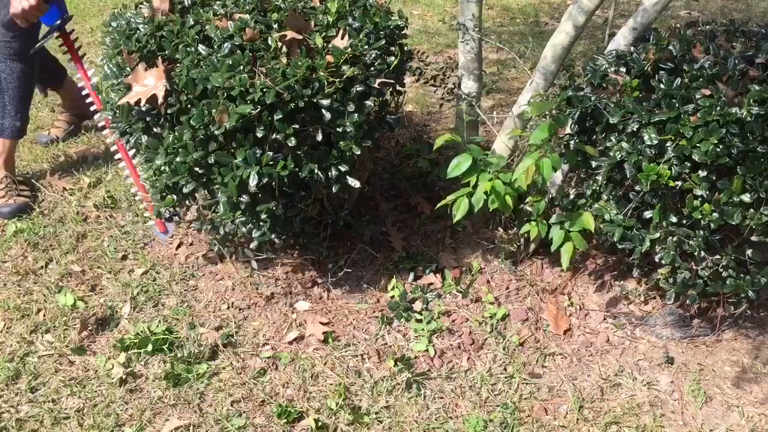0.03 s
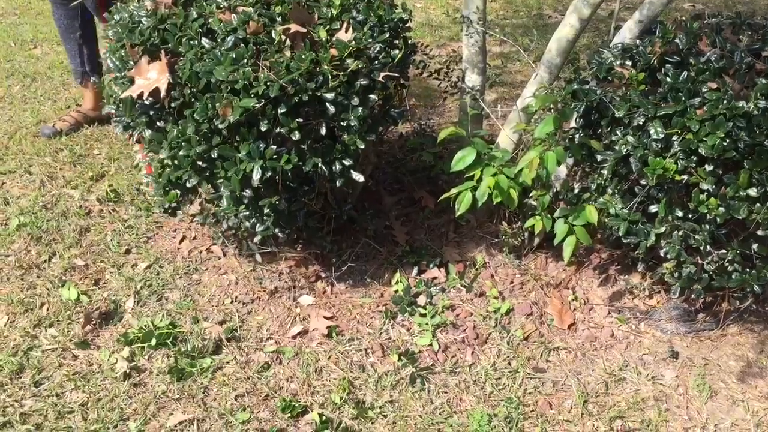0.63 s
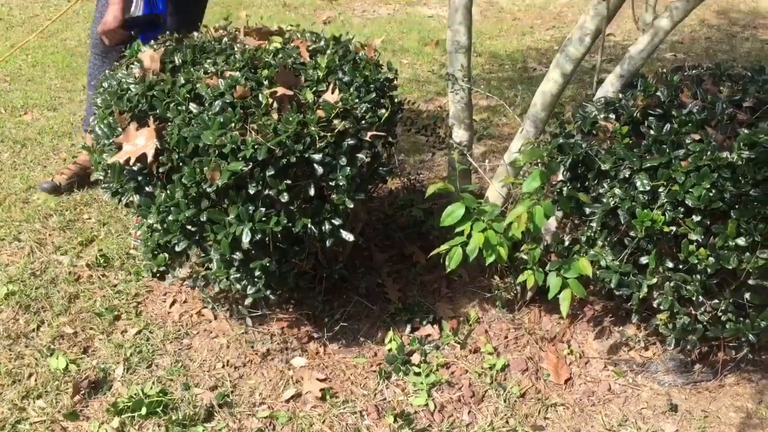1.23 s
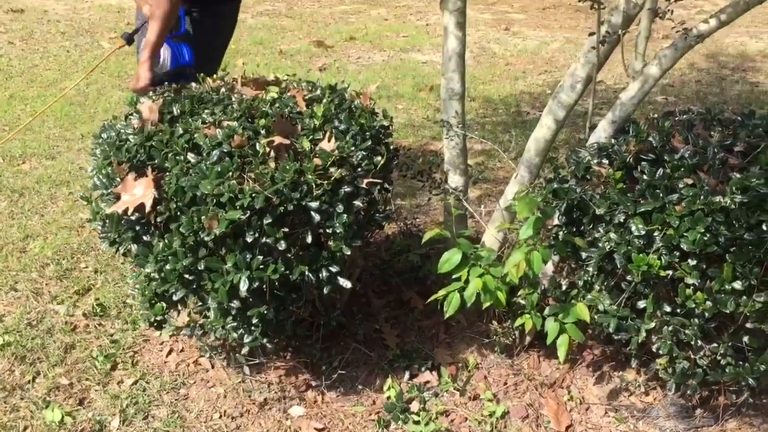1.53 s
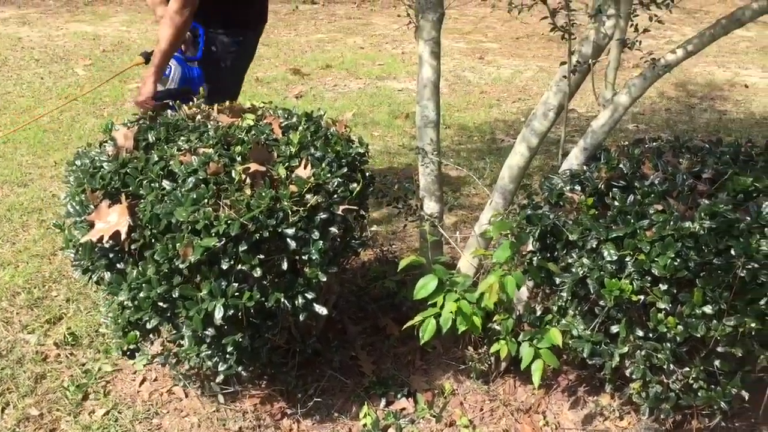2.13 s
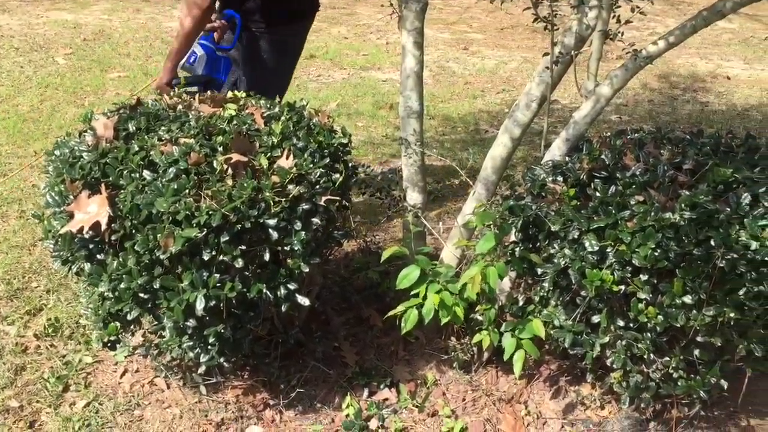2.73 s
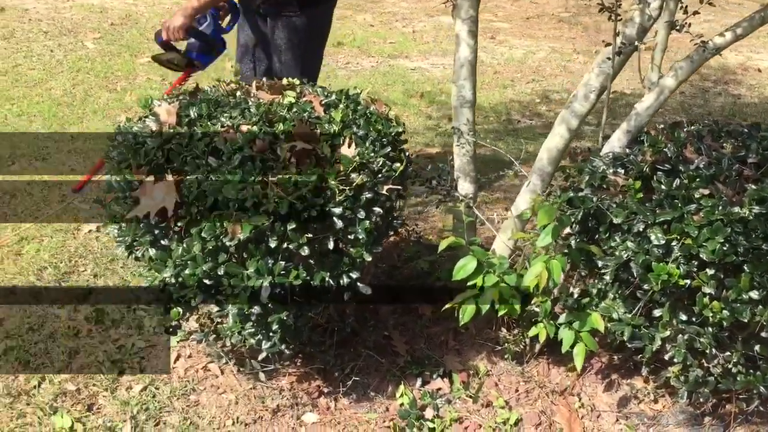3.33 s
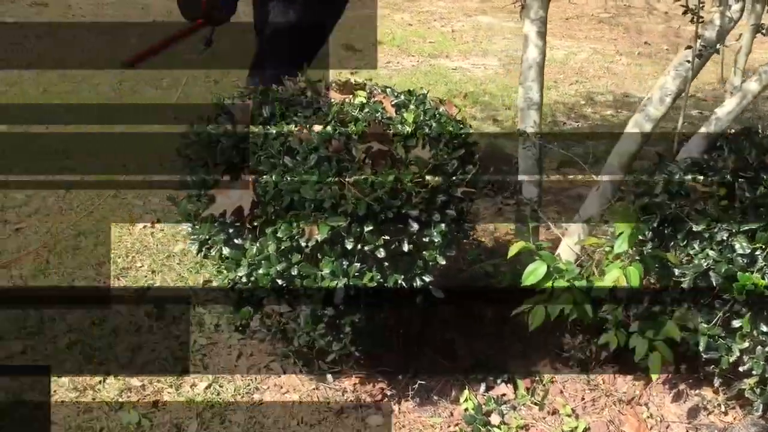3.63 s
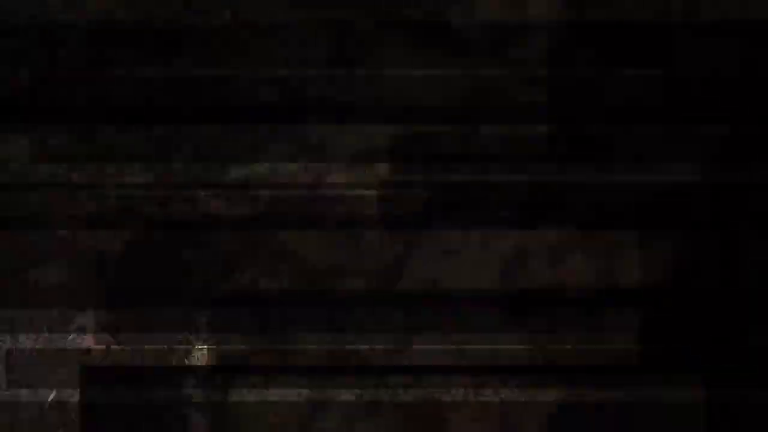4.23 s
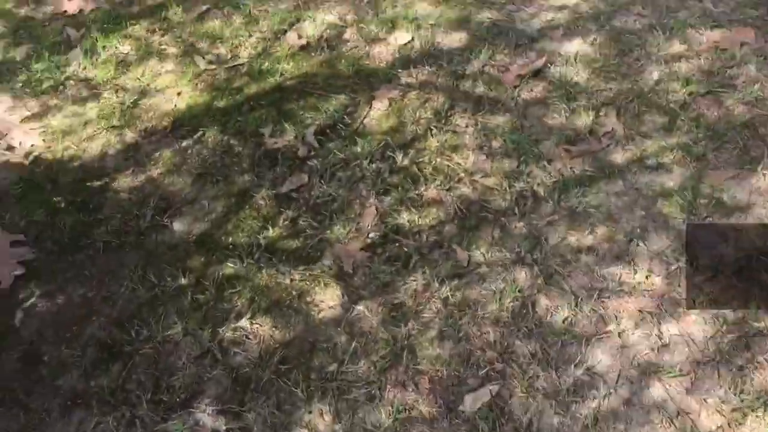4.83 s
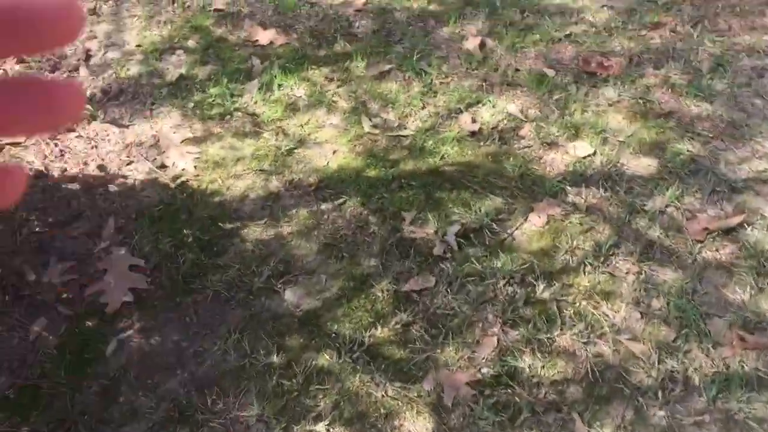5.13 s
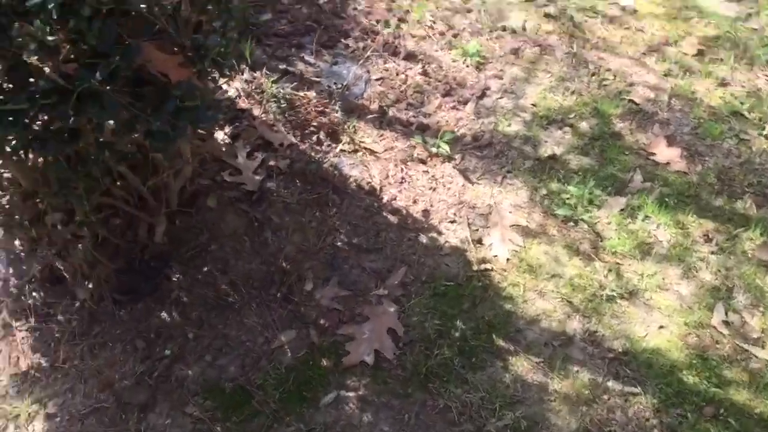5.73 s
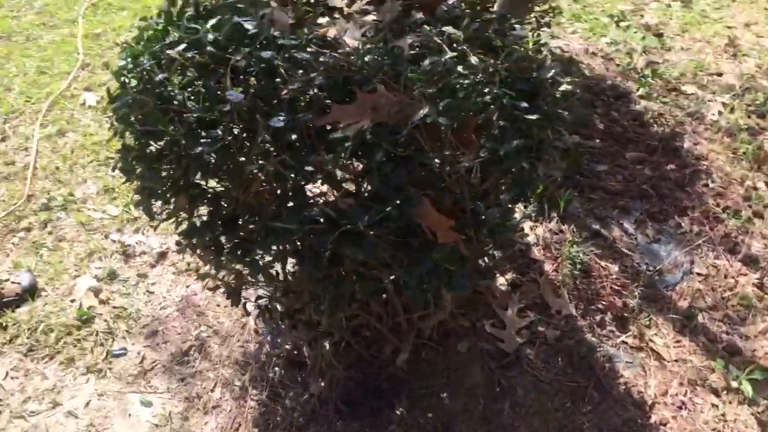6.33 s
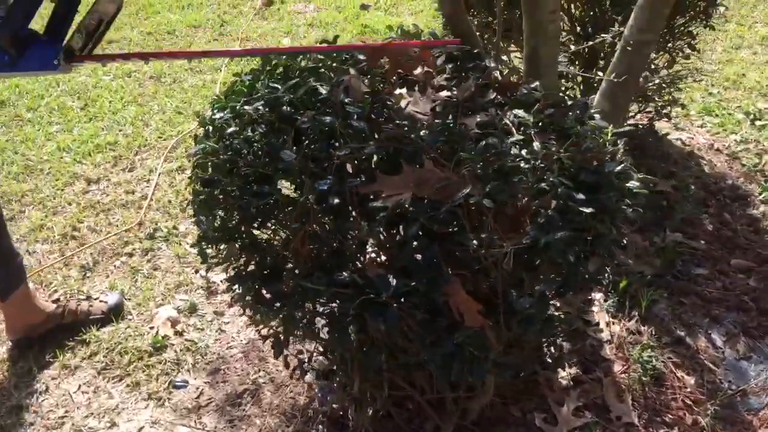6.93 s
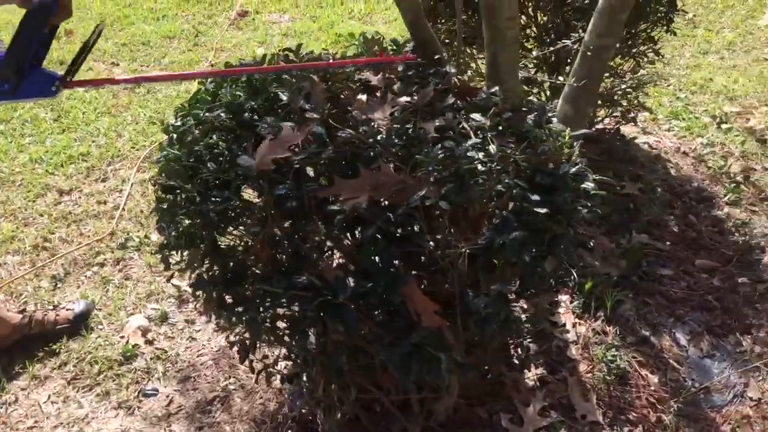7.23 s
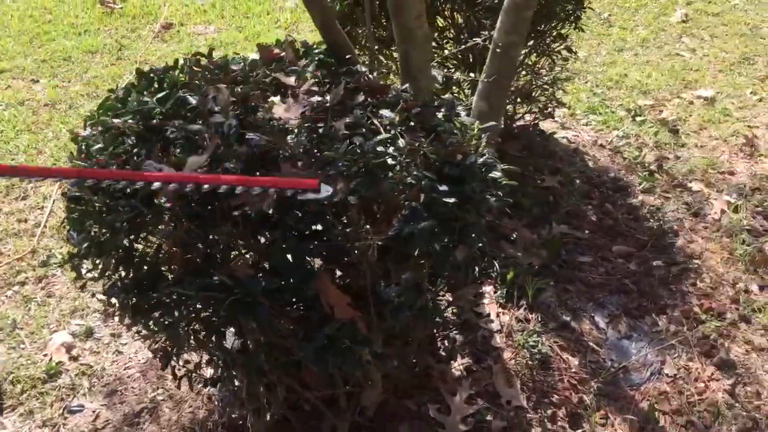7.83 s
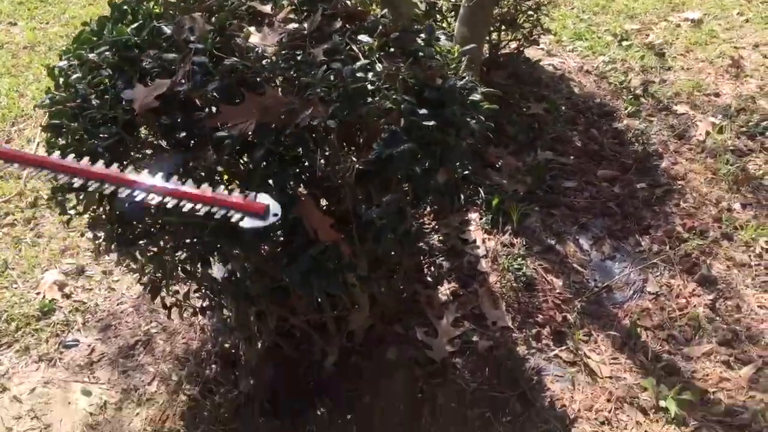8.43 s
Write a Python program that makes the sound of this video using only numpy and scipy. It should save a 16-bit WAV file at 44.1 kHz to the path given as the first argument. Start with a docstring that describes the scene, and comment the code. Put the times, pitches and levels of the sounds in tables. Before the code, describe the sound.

An electric hedge trimmer is already running, about three metres away and slightly screened by a shrub in an open yard. Its motor gives a steady mid-pitched hum with a throbbing gear whine and a thin, high fan whistle, while the blades knock, rattle and hiss rapidly. The whine swells and fades as the tool swings. Twigs crack with a leafy scrape around 0.3 seconds, snap sharply at 1.1, and tick again near 2.5. From 3.75 seconds the motor coasts down in pitch, and at 4.1 the sound drops out for an instant. It returns closer and fuller, reaching full speed by about 5 seconds. Foliage rasps along the bar between 4.8 and 5.6, with twigs splintering near 5.15. Two sharper snaps come at 7.5 and 7.8. The trimmer keeps running, about two metres away, until the end at 8.5 seconds. A faint, gusty outdoor rumble lies underneath.

```python
"""An electric hedge trimmer shapes a shrub in an open yard, two to three metres from the microphone:
first screened by the bush, then, after a brief hush, closer and in the clear.
The motor hums, its pinion and fan whine, and the blades knock and rattle at each turn of the crank.
Foliage scrapes along the bar; twigs snap between the teeth and slow the motor, which coasts down
before the hush and spins up after it. A faint outdoor rumble lies underneath."""
import numpy as np
from scipy import signal
from scipy.fft import rfft, irfft, next_fast_len
from scipy.ndimage import map_coordinates
import sys
import numpy as np
from scipy import signal
from scipy.fft import rfft, irfft, next_fast_len
from scipy.io import wavfile
from scipy.ndimage import map_coordinates

SR = 44100
rng = np.random.default_rng(int(sys.argv[2]) if len(sys.argv) > 2 else 0)


def store_pcm(level_fs):
    """Save levels as 16-bit WAV."""
    pcm = np.round(np.clip(level_fs, -1, 1) * 32767).astype(np.int16)
    wavfile.write(sys.argv[1], SR, np.atleast_2d(pcm).T)


N = 374409
TIME = np.arange(N) / SR
FFT_SIZE = next_fast_len(N)
BIN_HZ = np.maximum(np.arange(FFT_SIZE // 2 + 1) * SR / FFT_SIZE, 1)

NEAR_START_S = 4.1175   # the far pass ends and the near pass begins
FREE_FAR_HZ, FREE_NEAR_HZ = 449.4, 447.4   # free-running motor speed in each pass

# Twigs being cut: start_s, relative_level_db, decay_t60_s, motor_braking_hz
TWIG_CUTS = [(0.273, -17, 0.051, 0.94), (0.293, -15, 0.06, 1.9), (.312, -19, 0.039, 0.57),
             (1.0592, -9.5, 0.056, 6.2), (2.495, -14, 0.036, 0.32), (2.53, -23, .04, 0.46),
             (2.567, -13, 0.036, 2.3), (5.13, -18, 0.09, 3.5), (5.17, -16.5, 0.1, 3.2),
             (7.459, -9.5, 0.12, 4.9), (7.785, -9, 0.028, .3)]


def from_db(db):
    """Decibels to gain."""
    return 10 ** (np.asarray(db) / 20)


def unit_power(x):
    """Scale to an RMS of one."""
    return x / np.sqrt(np.mean(x ** 2) + 1e-20)


def in_time(rows):
    """Each column after time_s as a curve, sample by sample."""
    times, *columns = np.transpose(rows)
    return [np.interp(TIME, times, column) for column in columns]


def colour(points):
    """Gain at every frequency from rows of frequency_hz, level_db."""
    hz, db = np.transpose(points)
    return from_db(np.interp(np.log(BIN_HZ), np.log(hz), db))


def shaped(x, gain):
    """Filter by a gain per frequency and scale to unit power."""
    return unit_power(irfft(rfft(x, FFT_SIZE) * gain, FFT_SIZE)[:N])


def drift(rate_hz):
    """Smooth random wander with a spread of one."""
    points = rng.standard_normal(16384)
    hz = np.arange(len(points) // 2 + 1) * SR / N
    slow = unit_power(irfft(rfft(points) / (1 + (hz / rate_hz) ** 2)))
    return np.interp(TIME, np.linspace(0, N / SR, len(slow)), slow)


def contacts(per_s, spread_db):
    """Random tiny impacts of uneven size."""
    sizes = from_db(spread_db * np.minimum(rng.exponential(1, N), 4))
    return unit_power((rng.random(N) < per_s / SR) * sizes * rng.standard_normal(N))


def blend(far, near, nearness):
    """Pass from behind the bush (nearness 0) to close by (1)."""
    return far + nearness * (near - far)


def yard():
    """Faint, gusty low rumble of the open air."""
    # Outdoor rumble: frequency_hz, relative_level_db
    spectrum = [(20, -32), (35, -19), (55, -5.5), (90, -5), (150, -6), (300, -13), (1000, -28.5)]
    # Its level between gusts and lulls: time_s, level_db
    levels = [(0, -56.5), (1.75, -54), (2.2, -58), (3.6, -51), (4.7, -57), (4.95, -65), (5.75, -60),
              (6.25, -51.5), (8.49, -54)]
    gust_db = 2 * drift(2.5)
    return from_db(in_time(levels)[0] + gust_db) * shaped(rng.standard_normal(N), colour(spectrum))


def reflections(x, strength, longest_s, sway_s, count):
    """Ground, trunks and the gardener throw back short echoes; their paths sway as the tool is swung."""
    out = x.copy()
    for lag_s in rng.uniform(0.001213, longest_s, count):
        positions = (TIME - lag_s - sway_s * drift(1.0)) * SR
        out += strength * map_coordinates(x, [positions], order=3)
    return out / np.sqrt(1 + count * strength ** 2)


def scrapes(stroke_db):
    """A branch or leaf drags over the teeth: fine slips in one resonance, pulsing with the stroke."""
    # Foliage along the bar: middle_s, length_s, level_db, centre_hz, width_hz
    drags = [(0.297, .08, -29.5, 2900, 1800), (.3, 0.051, -36, 10000, 8000), (4.815, .02, -34, 12000, 6000),
             (5.135, 0.011, -32, 11450, 6000), (5.173, 0.088, -27, 2550, 450),
             (5.175, 0.022, -27, 11500, 7000), (5.362, 0.32, -30.5, 1540, 451),
             (5.57, .1, -36, 12480, 5000)]
    slips = contacts(per_s=9000, spread_db=1.0) * from_db(.5 * stroke_db)
    out = np.zeros(N)
    for middle_s, length_s, level_db, centre_hz, width_hz in drags:
        rasp = shaped(slips, 1 / (1 + (2 * (BIN_HZ - centre_hz) / width_hz) ** 2))
        swell = np.exp(-(2 * (TIME - middle_s) / length_s) ** 2)
        out += from_db(level_db) * swell * rasp
    return out


def twigs():
    """Each twig splinters in a short burst of cracks that dies away."""
    envelope = np.zeros(N)
    for start_s, level_db, t60_s, _ in TWIG_CUTS:
        age = np.clip(TIME - start_s, 0, 1)
        envelope += from_db(level_db - 60 * age / t60_s) * (1 - np.exp(-age / 0.0011))
    wood = colour([(200, -21.5), (800, -4), (1600, 7.5), (3500, -5.5), (8000, -4.5), (16000, -19.0)])
    return from_db(-2.5) * envelope * shaped(contacts(per_s=16000, spread_db=0.99), wood)


def motor_speed(release_s=3.751, coast_s=.261, spin_up_s=.292, bite_s=.015, recover_s=.283):
    """Turns per second: drag slows the released motor, it spins up again, and each twig brakes it."""
    coast = FREE_FAR_HZ / (1 + np.maximum(TIME - release_s, 0) / coast_s) ** .34
    spin_up = FREE_NEAR_HZ - 76.8 * np.exp(-np.maximum(TIME - NEAR_START_S, 0) / spin_up_s)
    speed_hz = np.where(TIME < NEAR_START_S, coast, spin_up)
    for start_s, _, _, braking_hz in TWIG_CUTS:
        age = np.maximum(TIME - start_s, 0)
        speed_hz -= braking_hz * (1 - np.exp(-age / bite_s)) * np.exp(-age / recover_s)
    return speed_hz


def crank(turns, gear_ratio=17.75, knock_rattle_db=4, knock_load_db=11):
    """Swings of blade rattle and gear load in dB; play in the linkage makes each knock a little uneven."""
    # A hard reversal and a softer return: angle_turns, strength, rise_turns, fall_turns
    knocks = [(.09, 0.87, 0.034, 0.27), (.58, 0.02, 0.055, 0.071)]
    phase_turns = np.where(TIME < NEAR_START_S, .832, .426)
    angle = turns / gear_ratio - phase_turns + .008 * drift(10)
    knock = np.zeros(N)
    for at, strength, rise, fall in knocks:
        since, until = (angle - at) % 1, (at - angle) % 1
        knock += strength * np.maximum(np.exp(-(since / fall) ** 1.5), np.exp(-(until / rise) ** 2))
    force = (knock - knock.mean()) * (1 + .18 * np.tanh(drift(10)))
    return knock_rattle_db * force, knock_load_db * force


def order_tone(turns, order, flutter_db):
    """A tone locked to the motor; the shaft's jitter blurs high orders more than low ones."""
    jitter = .13 * np.sqrt(order) * drift(14)
    flutter = from_db(flutter_db * np.tanh(drift(30)))
    return unit_power(np.sin(2 * np.pi * order * turns + jitter) * flutter)


def pinion(turns, load_db, order=4):
    """The gear whines in throbs: its teeth press hardest as the blades reverse."""
    # The pinion at 1 m, swelling as the tool is swung: time_s, whine_db, octave_db
    levels = [(0, -28.5, -30), (.75, -33, -45), (1.0, -24, -45), (1.9, -26.5, -41), (2.45, -19.5, -33),
              (2.8, -26.5, -32), (3.3, -20, -39), (3.6, -28, -32), (4.0, -28, -29), (4.22, -18.5, -38),
              (4.5, -28, -29), (4.95, -25, -34), (5.4, -30, -39), (5.75, -18, -33), (6.05, -32, -36),
              (6.35, -19.5, -25.5), (7.0, -22, -25), (7.35, -31, -27), (7.95, -33, -25), (8.25, -23.5, -49)]
    whine_db, octave_db = in_time(levels)
    whine = unit_power(from_db(1.4 * load_db)) * order_tone(turns, order, flutter_db=2.5)
    octave = unit_power(from_db(0.96 * load_db)) * order_tone(turns, 2 * order, flutter_db=3.5)
    return from_db(whine_db) * whine + from_db(octave_db) * octave


def motor(turns, speed_db, load_db, nearness, rattle_db):
    """Unbalance hums and the fan whistles, swelling and fading as the tool is swung."""
    # How openly the housing faces the microphone: time_s, facing_db
    facing = [(0, -7), (1.2, -5), (1.45, 1), (2.0, -2), (2.5, 2), (3.3, 1), (3.55, -7.5), (4.3, -10.5),
              (5.0, -5.5), (5.7, -5.5), (6.3, 1), (8.49, -0.5)]
    # Hum, octave, fifth order, fan at 1 m: order, far_db, near_db, facing_weight, flutter_db, speed_power
    main_tones = [(1, -31, -26, 1, .5, 1.214), (2, -39, -33.5, -0.36, 12.5, 3.7),
                  (5, -28, -32.5, 2.5, 18, 0.52), (21, -30.5, -31, 1, 3.5, 7)]
    # Weaker tones, relative to the blade rattle: order, far_db, near_db
    weak_tones = [(3, -20.5, -17.5), (9, -21.5, -24.5), (12, -20, -16.5), (24, -35, -40)]
    facing_db, = in_time(facing)
    out = np.zeros(N)
    for order, far_db, near_db, facing_weight, flutter_db, speed_power in main_tones:
        level_db = blend(far_db, near_db, nearness) + facing_weight * facing_db + speed_power * speed_db
        swing_db = 3 * np.tanh(drift(1.9))
        out += from_db(level_db + swing_db) * order_tone(turns, order, flutter_db)
    # the weaker orders meet the body's resonances only near full speed
    off_speed_db = -10 * np.log10(1 + ((1 - from_db(speed_db)) / .025) ** 2)
    for order, far_db, near_db in weak_tones:
        level_db = rattle_db + off_speed_db + blend(far_db, near_db, nearness) + .4 * load_db
        out += from_db(level_db) * order_tone(turns, order, flutter_db=11.0)
    return out


def body_colours():
    """The tool's spectrum with its resonances: from behind the bush, and from close by."""
    # Blade noise, screened and close: frequency_hz, relative_level_db
    far_spectrum = [(160.0, -32.5), (300.0, -15.5), (430.0, -10), (620.0, -13.5), (850.0, -2.5),
                    (1600.0, -2), (1980.0, -4), (2280.0, -2), (2750.0, -7), (4000.0, -13), (4800.0, -18),
                    (5400.0, -12.5), (9400.0, -16), (10450.0, -18), (11300.0, -18.5), (15500.0, -23.5)]
    near_spectrum = [(160.0, -20), (280.0, -2.5), (400.0, 3), (660.0, -13.5), (860.0, -0.7), (1050.0, -4),
                     (1500.0, -4), (2900.0, -1), (3600.0, -1.3), (4450.0, -3), (4900.0, -6), (5400.0, -5),
                     (9400.0, -10.5), (10450.0, -15.5), (11300.0, -14.5), (15500.0, -20)]
    # Peaks and hollows of housing and blade bar: centre_hz, width_hz, far_db, near_db
    resonances = [(247, 39, 2, 2.5), (558, 49, -4, 5.5), (612, 89, -5.5, 6.5), (704, 62, 2.5, 5.5),
                  (890, 170, -1, -2.5), (976, 210, 0, -5), (1540, 210, 2, 2), (2320, 210, 4, -1.5),
                  (3620, 97, -7.5, 2.5), (4885, 390, -2, -5), (6370, 330, 0, 1.5), (7200, 150, 3.5, 4.5),
                  (7630, 960, -2.5, -2), (10420, 450, -4.5, -2)]
    peaks_db = sum(np.outer(db, np.exp(-(2 * (BIN_HZ - hz) / width) ** 2))
                   for hz, width, *db in resonances)
    return [colour(far_spectrum), colour(near_spectrum)] * from_db(peaks_db)


def blade_band(drive, colours, nearness, low_hz, high_hz):
    """One register of the tool's body, its colour passing from screened to close."""
    band = 1 / np.sqrt((1 + (low_hz / BIN_HZ) ** 16) * (1 + (BIN_HZ / high_hz) ** 16))
    far, near = (shaped(drive, band * gain) for gain in colours)
    return blend(far, near, nearness)


def blades(turns, stroke_db, nearness, rumble_db, rattle_db, hiss_db):
    """Steel slides and chatters on steel, in step with the crank and shaken by every turn of the motor."""
    shake = np.cos(2 * np.pi * turns)
    chatter = drift(72)
    leaves = drift(7.8)   # foliage brushes the bar in uneven flurries
    colours = body_colours()
    rumble = contacts(6000, 2.0) * from_db(0.6 * stroke_db)
    rattle = contacts(14000, 0.88) * from_db(stroke_db + 0.37 * shake + 0.33 * chatter)
    hiss = contacts(30000, 0.37) * from_db(0.65 * stroke_db + 0.35 * shake + chatter + 0.35 * leaves)
    sound = (from_db(rumble_db + 0.25) * blade_band(rumble, colours, nearness, 182, 625)
             + from_db(rattle_db - 1.5) * blade_band(rattle, colours, nearness, 603, 2830)
             + from_db(hiss_db - 1.48) * blade_band(hiss, colours, nearness, 3040, 26000))
    return reflections(sound, strength=.13, longest_s=.007, sway_s=.00015, count=4)


def trimmer(turns, speed_hz, stroke_db, load_db):
    """Blades, pinion and motor as they reach the microphone, weakened by distance."""
    # How near and unscreened the tool is: time_s, nearness (0-1)
    exposure = [(0, 0.06), (3.2, 0.13), (4.0, 0.45), (4.3, 0.97), (8.49, 0.89)]
    # From microphone to tool: time_s, distance_m
    path = [(0, 2.59), (3.0, 3.1), (3.5, 3.3), (4.1, 3.14), (4.3, 2.75), (5.3, 2.5), (6.4, 2.14),
            (7.5, 1.92), (8.49, 2.12)]
    # Relative levels of housing rumble, blade rattle and blade hiss: far_db, near_db, speed_power
    noises = [(-35, -28.5, -0.57), (-15.5, -15.5, 0.59), (-20, -15.5, 1.1)]
    # The hiss brightens and dulls: time_s, gain_db
    treble = [(3.3, 3), (3.72, 3.5), (4.05, 0.5), (4.2, -3), (4.4, -2.5), (4.8, .5), (5.17, .5),
              (5.28, -3.5), (5.45, 0.5), (6.4, 1.5), (8.49, 0.7)]
    nearness, = in_time(exposure)
    speed_db = 20 * np.log10(speed_hz / FREE_FAR_HZ)
    rumble_db, rattle_db, hiss_db = (blend(far_db, near_db, nearness) + speed_power * speed_db
                                     for far_db, near_db, speed_power in noises)
    tool = blades(turns, stroke_db, nearness, rumble_db, rattle_db, hiss_db + in_time(treble)[0])
    tool += pinion(turns, load_db)
    tool += motor(turns, speed_db, load_db, nearness, rattle_db)
    return tool / in_time(path)[0]


def hush(fade_s=0.033, floor_db=-32):
    """The level fades out and straight back in between the passes."""
    return np.clip(np.abs(TIME - NEAR_START_S) / fade_s, from_db(floor_db), 1)


def scene():
    """The trimmer, the foliage and the yard at one microphone, the same in both channels."""
    speed_hz = motor_speed()
    turns = np.cumsum(speed_hz) / SR + .07 * drift(1.5)   # the shaft runs a little ahead and behind
    stroke_db, load_db = crank(turns)
    tool = trimmer(turns, speed_hz, stroke_db, load_db)
    mono = (tool + twigs() + scrapes(stroke_db) + yard()) * hush()
    return np.array([mono, mono])


def record(dry):
    """A steep low-pass takes off the highest treble."""
    cutoff_hz = 15750
    return signal.sosfilt(signal.ellip(12, .1, 90, cutoff_hz, fs=SR, output="sos"), dry)


dry = scene()
out = record(dry)
store_pcm(out)
```